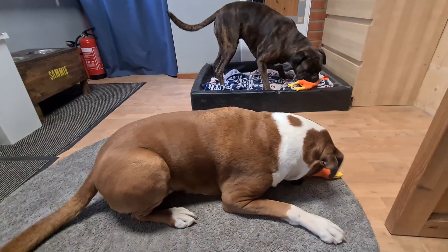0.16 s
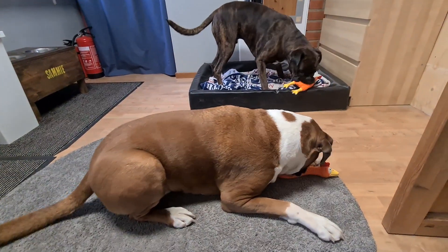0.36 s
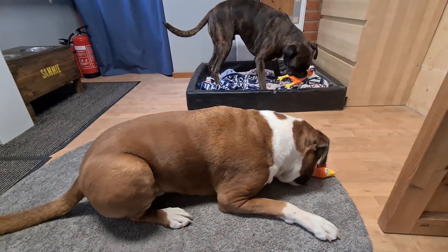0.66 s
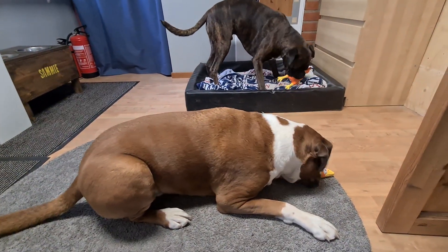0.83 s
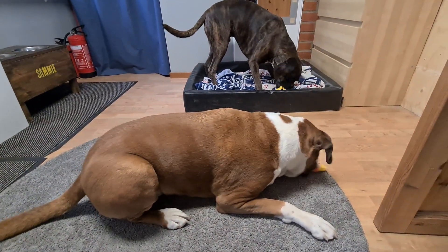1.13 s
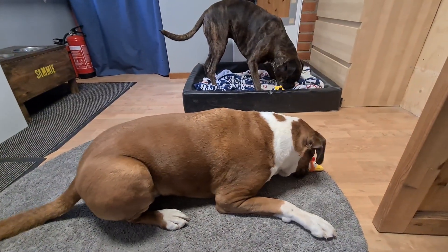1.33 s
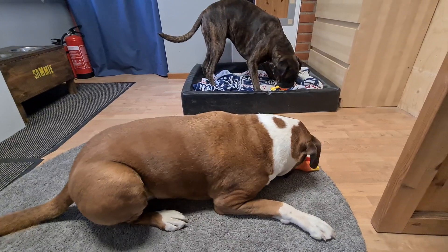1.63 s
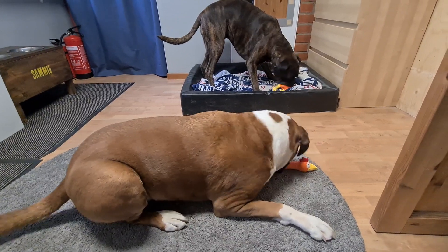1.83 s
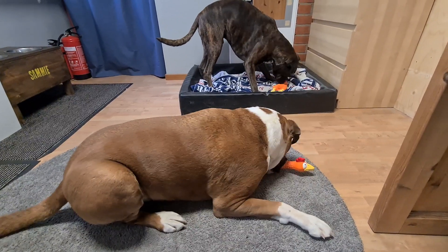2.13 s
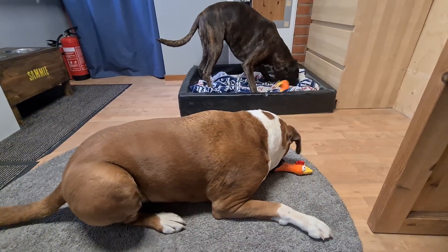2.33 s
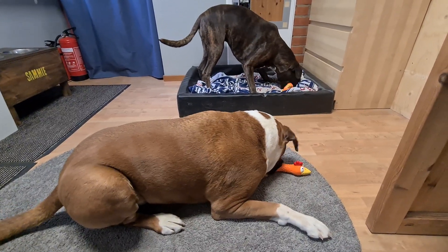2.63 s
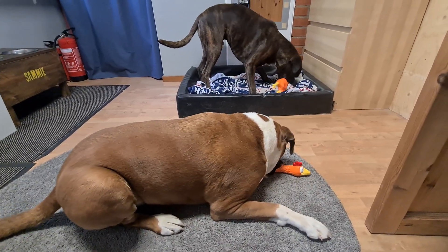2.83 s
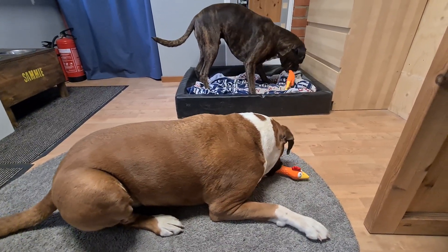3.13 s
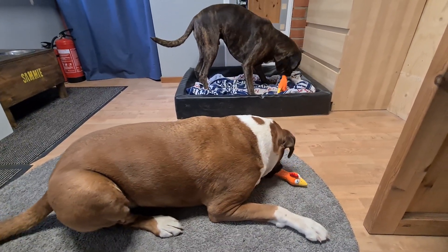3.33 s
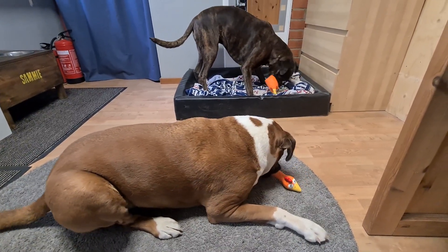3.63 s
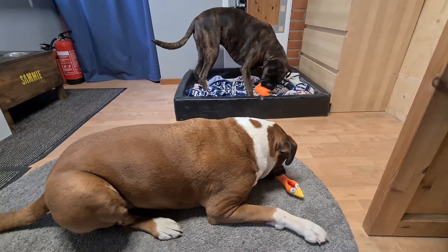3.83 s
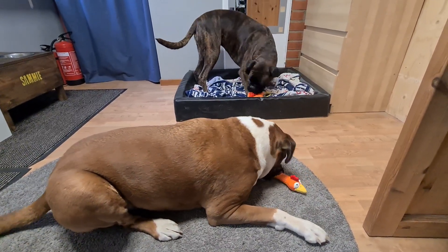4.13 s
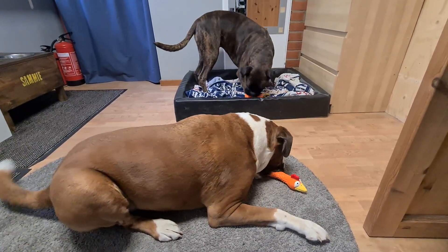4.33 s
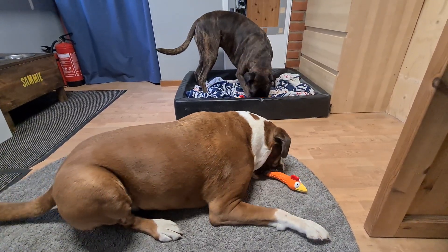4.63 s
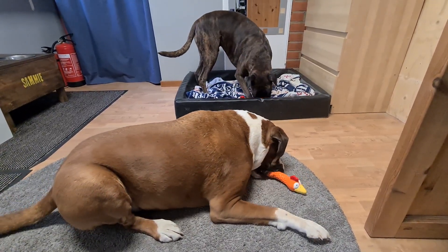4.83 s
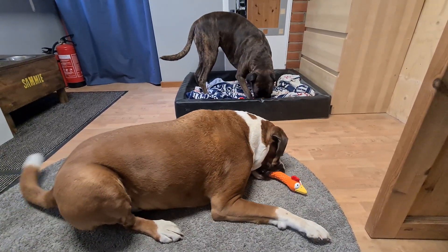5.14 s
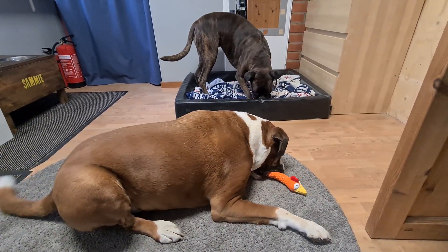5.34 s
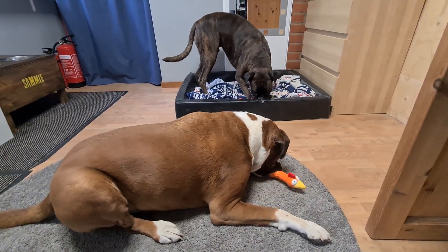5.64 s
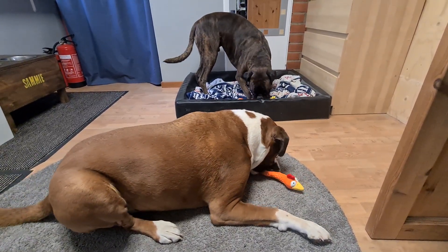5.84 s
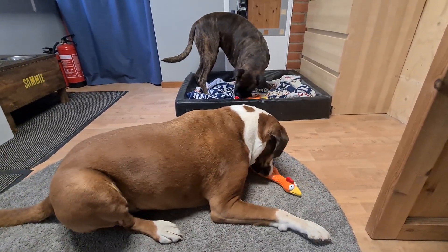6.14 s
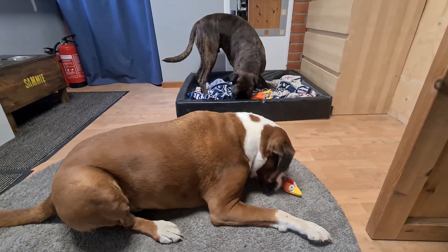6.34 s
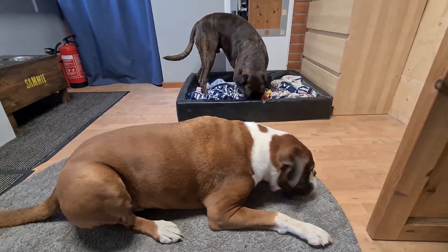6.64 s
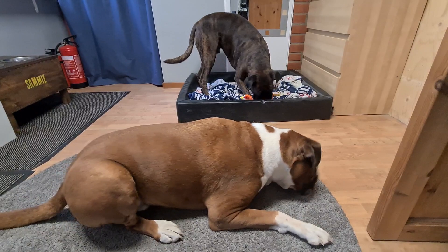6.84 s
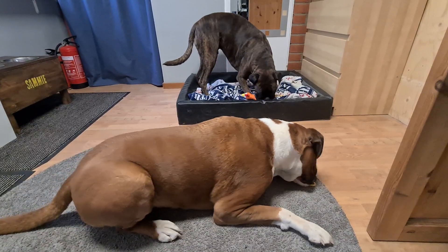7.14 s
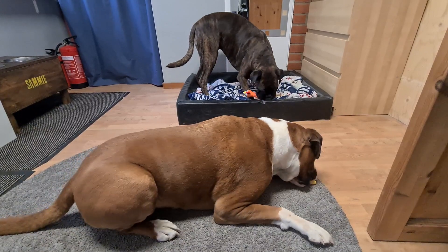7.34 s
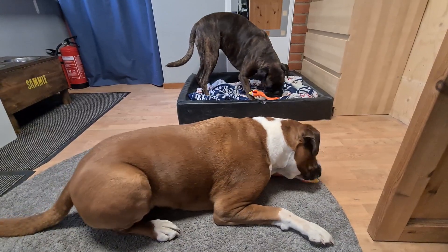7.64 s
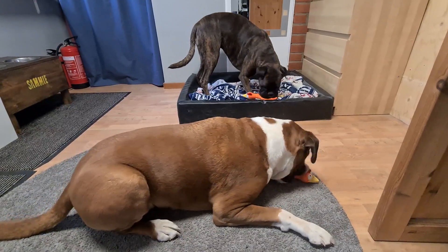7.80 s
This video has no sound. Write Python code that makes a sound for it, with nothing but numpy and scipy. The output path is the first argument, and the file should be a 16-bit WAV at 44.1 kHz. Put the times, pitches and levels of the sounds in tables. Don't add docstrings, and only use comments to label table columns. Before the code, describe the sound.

In a small hard-floored room, two dogs bite rubber squeaky toys, one close and one farther away. After a small nip and a knock, the near toy climbs at about 0.35 seconds into a very high piercing shriek, snaps at 0.6, sags to a hoarse growling squeak and yodels until 0.95. Tiny pips follow, then leaping squeaks from 1.4 to 1.8. The far toy chirps at 2.1, pips near 2.5 to 2.9, and gives long wavering squeaks from 3.1 to 4.0. Until 4.7 there are mostly dull bumps. Faint squeaks and breathy air refills lead to livelier squeaks at 5.5 to 5.9. Another lull carries thumps and rustling; hoarse near squeaks resume from 6.8 to 7.75, ending with a light nip and taps. Low rumble and bedding movement lie underneath, with close stereo sound and short reflections.

```python
import sys
import numpy as np
from scipy import signal
from scipy.fft import rfft, irfft, next_fast_len
from scipy.io import wavfile
from scipy.ndimage import uniform_filter1d

SR = 44100
rng = np.random.default_rng(int(sys.argv[2]) if len(sys.argv) > 2 else 0)


def attenuation_scalar(level_db):
    decades = np.asarray(level_db, float) / 20
    return 10 ** decades


def to_wav(sig):
    pcm = np.clip(np.atleast_2d(sig), -1, 1) * 32767
    pcm = np.round(pcm).astype(np.int16)
    wavfile.write(sys.argv[1], SR, pcm.T)


N = 351477

# pitch_hz, level_db
HISS_COLOUR = [(3000, -18), (8000, -3.5), (10000, 2), (14000, 4.5), (15700, -7)]
HISS_DB = -84.5
# pitch_hz, left_minus_right_db
PORT_LEAN = [(30, -8.5), (80, -0.5), (200, -1), (600, 0), (1400, -2.5), (3000, -4), (6000, -2), (9000, -1),
             (13000, 1)]
NOTCH_HZ, NOTCH_WIDTH_HZ, NOTCH_DB = 7180, 290, -2
# pitch_hz, likeness (0 to 1)
LIKENESS = [(30, 0.4), (70, .8), (120, 1), (400, 0.81), (1000, 0.23), (4000, 0.33)]
# pitch_hz, t60_s
ROOM_T60 = [(150, 0.2), (1200, 0.22), (4000, 0.22), (7000, 0.13), (14000, 0.19)]

# start_s, level_db
RUMBLE = [(0.0, -45), (0.58, -46.5), (0.8, -54), (3.9, -51.5), (4.2, -59.5), (4.62, -61.5), (4.75, -50.5),
          (6.2, -54.5), (7.75, -54.5), (7.97, -48.5)]
# pitch_hz, level_db_per_hz
FLOOR_COLOUR = [(12, -40), (20, -11.5), (80, 2.5), (167, -15), (248, -0.5), (356, -3), (546, -15.5),
                (615, -7.5), (994, -6.5), (1080, -18), (1200, -16), (1560, -46), (2640, -120)]
# start_s, level_db
RUSTLE = [
    (0, -61.5),
    (4.2, -73),
    (4.5, -72),
    (6.1, -71),
    (6.3, -67),
    (6.5, -66),
    (6.75, -67),
    (7.97, -54),
]
# pitch_hz, level_db_per_hz
RUSTLE_COLOUR = [(760, -24), (1300, 1.5), (2520, -8.5), (3020, -7.5), (5580, -14.5), (6780, -40.5),
                 (9000, -29), (11700, -59), (19800, -120)]
DUCK_DB, DUCK_FROM_DB = -11, -40

# start_s, peak_db
JAWS = [(0.709, -34), (0.795, -32.5), (1.025, -27.5), (1.355, -34.5), (2.117, -29.5), (2.282, -57),
        (2.695, -30.5), (3.296, -48), (3.616, -31.5), (3.776, -35.5), (4.269, -40.5), (4.497, -35.5),
        (4.74, -39), (5.005, -37), (5.6, -34.5), (5.718, -37.5), (5.814, -32.5), (6.803, -25.5),
        (7.827, -27.5)]
# start_s, peak_db
SHIFTS = [(.334, -28.5), (1.22, -41), (1.473, -36), (1.788, -29), (4.087, -35), (4.201, -37), (5.122, -40),
          (6.555, -25), (6.755, -33.5), (7.291, -36), (7.567, -46)]
# start_s, peak_db, centre_hz
KNOCKS = [(.181, -23.5, 323), (0.574, -38, 81), (2.005, -24, 404), (2.455, -32.5, 431), (2.523, -26, 97),
          (3.098, -35, 377), (3.49, -30.5, 320), (4.371, -45, 327), (4.5, -57.5, 450), (4.63, -41, 344),
          (4.649, -39, 77), (5.914, -35.5, 376), (6.073, -41.5, 320), (5.365, -37.5, 129),
          (5.447, -27.5, 105), (6.3, -50.5, 79), (7.091, -30.5, 172.7), (7.098, -26, 603),
          (7.738, -34.5, 359)]
# start_s, peak_db, centre_hz
TAPS = [(0.034, -58, 250), (0.121, -42, 802), (1.248, -40, 440), (2.457, -37.5, 434), (4.511, -37, 329),
        (4.579, -52, 384), (4.685, -44.5, 210), (6.562, -27, 358), (6.762, -37, 235.2), (7.835, -27.5, 601),
        (7.954, -24, 964)]
JAW_HZ, JAW_T60_S, SHIFT_HZ, SHIFT_T60_S = 250, 0.19, 245, 0.44
KNOCK_T60_S, TAP_T60_S = 0.2, 0.12
BLOW_RISE = 0.026
# start_s, peak_db
BOOMS = [(1.792, -27.5), (4.087, -31), (4.148, -28.5), (4.199, -31), (4.368, -47), (4.63, -39.5),
         (5.913, -30), (6.071, -35.5)]
BOOM_HZ, BOOM_T60_S = 225, 0.081
# start_s, peak_db
SNAPS = [(.588, -21.5), (2.58, -60), (.124, -59), (1.249, -64), (6.562, -62), (3.793, -41.5), (4.5, -75),
         (1.957, -43.5), (2.5, -52), (6.4, -55.5)]
SNAP_T60_S, SNAP_CUT_HZ = 0.046, 6500

# start_s, stop_s, first_hz, last_hz, level_db
WHISTLES = [(0.557, 0.86, 5300, 5700, -26.5), (3.139, 3.21, 1770, 2315, -44.5),
            (3.384, 3.463, 2100, 2000, -51.5), (3.805, 3.934, 2280, 1400, -45),
            (3.836, 3.95, 1134, 1000, -47.5), (5.65, 5.734, 3000, 1300, -39), (1.3, 0.72, 4000, 4300, -23),
            (5.64, 5.73, 3100, 2900, -43), (2.5, 2.84, 2100, 1850, -60)]
# start_s, stop_s, first_db, last_db
REFILLS = [(2.298, 2.44, -72, -110.5), (2.554, 2.698, -50.5, -62.5), (2.883, 3.205, -54.5, -43.5),
           (4.799, 4.942, -40, -38), (4.958, 5.171, -57, -46.5), (5.184, 5.395, -36, -41.5),
           (5.464, 5.531, -38.5, -57), (6.064, 6.343, -61, -59), (6.38, 6.56, -64.5, -58)]
# pitch_hz, level_db_per_hz
LEAK_COLOUR = [(900, -3.5), (1800, -2.5), (2400, -3), (3000, 11), (3600, -8), (5500, -11), (7000, -18),
               (15000, -27.5)]

# pitch_hz, level_db
NEAR_BODY = [(1180, -28), (2000, -5.5), (2560, -12.5), (3230, -8), (3520, -11.5), (4360, -4), (6140, -5.5),
             (7230, -21), (8730, -21), (11100, -16.5), (15500, -51)]
FAR_BODY = [(1180, -21), (2000, -17.5), (2700, 1.5), (3610, -2), (3940, 1.5), (4250, -1), (5740, 2.5),
            (7680, -17.5), (8360, -11), (12900, -12.5), (15500, -37)]
# opening_hz, closing_hz, overtones_db (against the tone), extra_db_per_db of effort, extra_db_per_octave
NEAR_REED = (1129.5, 1149, 2.5, 0.973, -11.5)
FAR_REED = (1311.5, 1271, -22, 0.35, 12)
# start_s, stop_s, air_db (against the overtones)
HOARSE = [(.37, .44, -7), (.58, .605, 0), (.6, .66, -13), (.66, .73, -18), (.73, .81, -20), (.885, .96, -7),
          (1.42, 1.47, -6), (1.575, 1.66, -4), (1.8, 1.85, -6), (1.995, 2.05, -10), (3.735, 3.81, -5),
          (3.81, 4.0, -14), (4.73, 4.83, -10), (4.93, 5.03, -12), (5.41, 5.48, -11), (5.565, 5.66, -4),
          (5.65, 5.79, -6), (5.805, 5.84, -6), (5.905, 5.97, -2), (6.82, 6.9, -5), (6.9, 6.97, -18),
          (6.965, 7.04, 0), (7.105, 7.25, -2), (7.3, 7.4, -7), (7.46, 7.53, 0), (7.69, 7.77, -8),
          (7.91, 7.97, -10)]
BREAK_UP = 1.15
# start_s, stop_s, overtones_db, high_extra_db, octave_extra_db
MOUTHING = [(0.167, .34, 4, 0, -3.8), (0.346, .435, -3.5, 2, 0.5), (0.439, .59, -4.5, -0.5, 12.3),
            (0.593, 0.724, 3.5, 2.5, -0.5), (0.727, .806, -5, 1.5, 2), (.806, 1.0, 3.5, -5.5, -1.1),
            (1.04, 1.351, -3.5, 0.5, -3), (1.391, 1.655, -2.5, -5, 3), (1.669, 1.901, 0.5, -0.5, -0.1),
            (1.947, 2.082, 6, -1.5, -13), (2.12, 2.35, -3, 2.5, 5.5), (2.477, 2.62, 3, 0, 5.5),
            (2.71, 2.904, 2, -2, 2.5), (3.082, 3.33, -4, 0, 3.5), (3.33, 3.6, -1, 1, -3),
            (3.61, 3.74, 2, 1, -1), (3.74, 4.1, 5, 2.5, -1.1), (4.697, 4.9, -0.5, -0.5, 0),
            (4.92, 5.22, -1, 3, 2), (5.24, 5.35, -1.5, 3.5, 7), (5.36, 5.5, -3, -0.5, 3.3),
            (5.537, 5.8, 1.5, -2.5, -1), (5.799, 6.001, -5, 3, 5), (6.798, 7.079, 1, 0.5, 0),
            (7.089, 7.279, 1.5, -6.5, 0.1), (7.293, 7.562, -0.5, -0.5, 0.3), (7.583, 7.801, 1.5, 1.5, 6.5),
            (7.826, 7.969, -1.5, -1, 3.5)]
HIGH_FROM_HZ = 7000

# start_s, length_s, top_hz, end_hz, level_db
NEAR_NIPS = [
    (.18, .09, 1174, 1086, -41.5),
    (7.832, 0.11, 1263, 1128, -41.5),
]
FAR_NIPS = [
    (2.722, .158, 1384, 1279, -34),
]
QUICK_NIPS = [
    (1.048, 0.05, 1115, 937.6, -47.5),
    (1.278, 0.051, 1103, 1083, -50.5),
]
FAR_QUICK_NIPS = [
    (2.485, .065, 1306, 1233, -41),
]
MUFFLED_NIPS = [
    (4.94, .24, 1186, 1035, -54),
]
FAR_MUFFLED_NIPS = [
    (5.7, 0.1, 1305, 1255, -35.5),
]
# full_effort_share of the length, start_db and end_db against full effort, top_pitch_share
NEAR_ARCH = (1, -6.5, -10, .5)
FAR_ARCH = (0.46, -8.5, -4, .5)
QUICK_ARCH = (0.4, 2.5, -5.5, -5.5)
MUFFLED_ARCH = (0.7, 5.5, -1.5, -0.7)
# start_s, pitch_hz, level_db
NEAR_SLIPS = [
    [(1.956, 1123, -51.5), (1.998, 1113, -51.5), (2.011, 1036, -62.5), (2.025, 1093, -56)],
    [(5.37, 1117, -55), (5.415, 1097, -50.5), (5.44, 1018, -51.5), (5.465, 1081, -63)],
]
FAR_SLIPS = [
    [(5.248, 1310, -38), (5.295, 1300, -39), (5.312, 1170, -50), (5.325, 1220, -48)],
]
# start_s, pitch_hz, level_db
FIRST_MAULING = [
    [(.35, 1163, -38), (.385, 1560, -34.5), (.393, 1560, -30.5), (.396, 1865, -37), (.412, 2290, -26.5),
     (.432, 2420, -43.5)],
    [(.434, 3234, -31.5), (.455, 3730, -27.5), (.475, 3860, -25), (.487, 4200, -22.5), (.52, 4287, -19.5),
     (.54, 4443, -20.5), (.556, 4473, -29), (.558, 5940, -36), (.572, 5820, -30.5), (.588, 5784, -28.5)],
    [(.59, 1930, -46.5), (.603, 1930, -38), (.613, 1776, -31), (.63, 1716, -41), (.64, 1501, -36.5),
     (.652, 1304, -39.5), (.685, 1203, -45), (.7, 1253, -39.5), (.718, 1594, -36)],
    [(.72, 1906, -34), (.751, 2021, -32), (.754, 2205, -29), (.765, 2212, -34.5), (.768, 1992, -29),
     (.79, 2072, -32.5), (.806, 2428, -31)],
    [(.808, 3202, -31), (.85, 3425, -29.5), (.872, 3330, -33), (.888, 2920, -28), (.9, 1766, -41),
     (.92, 1287, -39.5)],
]
SECOND_MAULING = [
    [(1.4, 1104, -43.5), (1.462, 1637, -39.5), (1.466, 2063, -37), (1.52, 1927, -34), (1.544, 2356, -34),
     (1.548, 3030, -26.5), (1.574, 3126, -41.5), (1.578, 1867, -36), (1.602, 1304, -39)],
    [(1.686, 1168, -42.5), (1.712, 1393, -40), (1.74, 1583, -39), (1.76, 1602, -38), (1.785, 1572, -39),
     (1.805, 1390, -41.5)],
]
LATE_CHEWS = [
    [(4.715, 1112, -54.5), (4.745, 1209, -44.5), (4.785, 1270, -45)],
    [(5.535, 1160, -49), (5.573, 1279, -40), (5.6, 1555, -40.5), (5.643, 1829, -38.5), (5.647, 2589, -38),
     (5.73, 2580, -40), (5.745, 1477, -51.5)],
    [(5.808, 1162, -41.5), (5.827, 1408, -40), (5.85, 1497, -38), (5.885, 1567, -39), (5.915, 1503, -41)],
    [(7.59, 1171, -48), (7.636, 1261, -46), (7.685, 1410, -44.5), (7.725, 1261, -46.5)],
    [(6.808, 1146, -46.5), (6.89, 1620, -38), (6.894, 2105, -36.5), (6.93, 2424, -35), (6.97, 2271, -37.5),
     (6.977, 2039, -37.5), (6.992, 1451, -43)],
    [(7.105, 1197, -45), (7.151, 2126, -38.5), (7.165, 2180, -39.5), (7.205, 1500, -43.5)],
    [(7.295, 1083, -45), (7.336, 1711, -39.5), (7.34, 1849, -38.5), (7.398, 2067, -38),
     (7.401, 2308, -35.5), (7.465, 2282, -37), (7.472, 2000, -38), (7.483, 1474, -43)],
]
FAR_CHEWS = [
    [(2.128, 1303, -39), (2.14, 1377, -33.5), (2.17, 1419, -33.5), (2.21, 1392, -30.5),
     (2.245, 1356, -33.5)],
    [(3.085, 1303, -45), (3.115, 1312, -32.5), (3.2, 1465, -30.5), (3.26, 1555, -31), (3.32, 1343, -30.5),
     (3.4, 1467, -30), (3.44, 1480, -27.5), (3.515, 1251, -31.5)],
    [(3.618, 1315, -35.5), (3.658, 1375, -29.5), (3.7, 1415, -31), (3.735, 1520, -26.5), (3.739, 1650, -33),
     (3.76, 1755, -30.5), (3.794, 1805, -30.5), (3.799, 1424, -29), (3.9, 1446, -30.5), (3.94, 1331, -30),
     (4.0, 1254, -39.5)],
]
LET_GO_S, LET_GO_DB = .045, -9.5
QUICK_SHINE_DB, MUFFLED_SHINE_DB, FAR_MUFFLED_SHINE_DB, LATE_SHINE_DB = 6.5, -2, -2.5, -2


def at_hz(points, hz):
    points = np.array(points)
    return np.interp(np.log(hz), np.log(points[:, 0]), points[:, 1])


def rms_one(x):
    return x / np.sqrt(np.mean(x ** 2) + 1e-20)


def filtered(x, order, cut_hz, kind="low"):
    return signal.sosfilt(signal.butter(order, cut_hz, kind, fs=SR, output="sos"), x)


def drift(rate_hz):
    r = np.exp(-2 * np.pi * rate_hz / SR)
    white = rng.standard_normal(N + SR)
    return rms_one(signal.lfilter([1], [1, -2 * r, r * r], white)[SR:])


def rasp(cut_hz):
    return rms_one(filtered(rng.standard_normal(N), 6, cut_hz))


def coloured(spectrum):
    size = next_fast_len(N)
    hz = np.maximum(np.fft.rfftfreq(size, 1 / SR), 1)
    white = rfft(rng.standard_normal(size))
    return rms_one(irfft(white * attenuation_scalar(at_hz(spectrum, hz)), size)[:N])


def window(start_s, stop_s):
    gate = np.zeros(N)
    span = np.arange(round(start_s * SR), round(stop_s * SR))
    from_edge_s = np.minimum(span / SR - start_s, stop_s - span / SR)
    gate[span] = np.clip(from_edge_s / .015, 0, 1)
    return gate


def half_octaves(low_hz, count):
    edges = low_hz * 2 ** (np.arange(count + 1) / 2)
    return [(np.sqrt(a * b), signal.butter(2, [a, b], "band", fs=SR, output="sos"))
            for a, b in zip(edges, edges[1:])]


def banded_noise(spectrum, low_hz, count, patchy_db, rate_hz):
    out, together = 0, drift(rate_hz / 3)
    white = rng.standard_normal((2, 2, N))
    for k, (hz, band) in enumerate(half_octaves(low_hz, count)):
        mid, side = signal.sosfilt(band, white[k % 2])
        alike = np.clip(at_hz(LIKENESS, hz), 0, 1)
        gain = attenuation_scalar(at_hz(spectrum, hz) + patchy_db * (together + drift(rate_hz)))
        out = out + gain * (np.sqrt(1 + alike) * mid + np.sqrt(1 - alike) * side * [[1], [-1]])
    return rms_one(out)


def room(x, gap_s):
    t = np.arange(SR // 2) / SR
    white = rng.standard_normal((2, len(t)))
    tail = 0
    for hz, band in half_octaves(61.43, count=16):
        tail = tail + signal.sosfilt(band, white) * attenuation_scalar(-60 * t / at_hz(ROOM_T60, hz))
    tail = rms_one(tail * np.clip(t / gap_s - 1, 0, 1)) / np.sqrt(len(t))
    return signal.fftconvolve(x[None], tail, axes=1)[:, :N]


def place(x, lag):
    return np.array([np.interp(np.arange(N) - lag, np.arange(N), x), x])


def hiss():
    return attenuation_scalar(HISS_DB) * np.array([coloured(HISS_COLOUR), coloured(HISS_COLOUR)])


def rumble():
    level_db = np.interp(np.arange(N) / SR, *np.transpose(RUMBLE))
    return filtered(attenuation_scalar(level_db) * banded_noise(FLOOR_COLOUR, 18, count=12, patchy_db=3, rate_hz=10), 6, 950)


def rustle(squeaks):
    level_db = np.interp(np.arange(N) / SR, *np.transpose(RUSTLE))
    brushing = attenuation_scalar(level_db) * banded_noise(RUSTLE_COLOUR, 900, count=7, patchy_db=1.2, rate_hz=15)
    loud = uniform_filter1d(squeaks ** 2, size=1000) / attenuation_scalar(2 * DUCK_FROM_DB)
    return brushing * attenuation_scalar(DUCK_DB * loud / (1 + loud))


def thumps():
    out, t = np.zeros(N + SR), np.arange(SR // 2) / SR
    blows = [(*row, JAW_HZ, JAW_T60_S) for row in JAWS]
    blows += [(*row, SHIFT_HZ, SHIFT_T60_S) for row in SHIFTS]
    blows += [(*row, KNOCK_T60_S) for row in KNOCKS]
    blows += [(*row, TAP_T60_S) for row in TAPS]
    for start_s, peak_db, hz, t60_s in blows:
        burst = rms_one(filtered(rng.standard_normal(len(t)), 1, [hz / 1.27, hz * 1.47], "band"))
        burst = filtered(burst, 4, 1000)
        rise = np.clip(t / (BLOW_RISE * t60_s), 0, 1)
        decay = attenuation_scalar(-60 * t / max(t60_s, .03)) * (1 - 2 * t)
        out[round(start_s * SR):][:len(t)] += attenuation_scalar(peak_db - 9.5) * burst * rise * decay
    return out[:N]


def booms():
    pushes = np.zeros(N)
    pushes[[round(s * SR) for s, db in BOOMS]] = attenuation_scalar(np.array(BOOMS)[:, 1])
    soft = signal.lfilter(np.hanning(200) / 60, 1, pushes) + 1e-18
    r, w = attenuation_scalar(-60 / (BOOM_T60_S * SR)), 2 * np.pi * BOOM_HZ / SR
    ring = signal.lfilter([0, np.sin(w)], [1, -2 * r * np.cos(w), r * r], soft)
    return filtered(ring, 2, 120, "high")


def snaps():
    t = np.arange(N) / SR
    shape = sum(attenuation_scalar(db - 60 * np.maximum(t - s, 0) / SNAP_T60_S) * (t >= s) for s, db in SNAPS)
    return shape * filtered(rng.standard_normal(N), 2, SNAP_CUT_HZ)


def whistles():
    t, out = np.arange(N) / SR, 0
    for start_s, stop_s, first_hz, last_hz, db in WHISTLES:
        hz = np.interp(t, [start_s, stop_s], [first_hz, last_hz])
        tone = np.sin(2 * np.pi * np.cumsum(hz) / SR)
        out = out + attenuation_scalar(db) * window(start_s, stop_s) * rasp(cut_hz=59) * tone
    return out


def stretches_in_time(stretches, smooth):
    t, gate = np.arange(N) / SR, np.zeros(N)
    first_values = np.array(stretches[0][0][1:])
    columns = np.zeros((len(first_values), N)) + first_values[:, None]
    for rows in stretches:
        s, *values = np.transpose(sorted(rows))
        start, stop = round(s[0] * SR), round(s[-1] * SR)
        line = np.array([np.interp(t[start:stop], s, v) for v in values])
        columns[:, start:stop] = uniform_filter1d(line, size=smooth, mode="nearest")
        columns[:, stop:] = columns[:, stop - 1:stop]
        gate[start:stop + 100] = 1
    gate = gate * np.roll(gate, 160)
    in_use = np.roll(gate, -160)[:-150] + gate[:-150] > 0
    columns[:, :-150] = np.where(in_use, columns[:, :-150], columns[:, 150:])
    return columns, uniform_filter1d(gate, size=180)


def leak():
    refills = [[(a, first_db), (b, last_db)] for a, b, first_db, last_db in REFILLS]
    (level_db,), open_valve = stretches_in_time(refills, smooth=1200)
    return uniform_filter1d(open_valve, size=1500) * attenuation_scalar(level_db - 7.5) * coloured(LEAK_COLOUR)


def nips(rows, reed, arch):
    effort_share, start_db, end_db, top_share = arch
    u = np.linspace(0, 1, 9)
    swell_db = np.interp(u, [0, np.clip(effort_share, .05, .95), 1], [start_db, 0, end_db])
    lift = np.sin(np.interp(u, [0, np.clip(top_share, .05, .95), 1], [0, np.pi / 2, np.pi]))
    out = []
    for s, length_s, top_hz, end_hz, db in rows:
        rest_hz = np.where(u < max(top_share, .05), reed[0], end_hz)
        out.append(list(zip(s + length_s * u, (1 - lift) * rest_hz + lift * top_hz, db + swell_db)))
    return out


def chews(bites, reed):
    out, starts = [], np.array([min(b)[0] for b in bites])
    for rows in map(sorted, bites):
        last_s, _, last_db = rows[-1]
        if np.abs(starts - last_s).min() > .04:
            rows = rows + [(last_s + LET_GO_S, reed[1], last_db + LET_GO_DB)]
        out.append([rows[0]])
        for before, row in zip(rows, rows[1:]):
            if row[0] - before[0] < .007 and abs(np.log(row[1] / before[1])) > .09:
                out.append([])
            out[-1].append(row)
    return out


def voiced(stretches, reed, shine_db=0):
    opening_hz, _, overtones_db, per_db, per_octave = reed

    def upper_db(hz, db):
        return db + shine_db + overtones_db + per_db * (db + 40) + per_octave * np.log2(hz / opening_hz)

    return [[(s, hz, db, upper_db(hz, db)) for s, hz, db in rows] for rows in stretches if len(rows) > 1]


def far_bites():
    plain = nips(FAR_NIPS, FAR_REED, FAR_ARCH) + nips(FAR_QUICK_NIPS, FAR_REED, QUICK_ARCH)
    plain += chews(FAR_CHEWS, FAR_REED)
    muffled = nips(FAR_MUFFLED_NIPS, FAR_REED, QUICK_ARCH) + FAR_SLIPS
    return sorted(voiced(plain, FAR_REED) + voiced(muffled, FAR_REED, FAR_MUFFLED_SHINE_DB))


def near_bites():
    plain = nips(NEAR_NIPS, NEAR_REED, NEAR_ARCH) + chews(FIRST_MAULING + SECOND_MAULING, NEAR_REED)
    late = chews(LATE_CHEWS, NEAR_REED)
    quick = nips(QUICK_NIPS, NEAR_REED, QUICK_ARCH) + NEAR_SLIPS
    muffled = nips(MUFFLED_NIPS, NEAR_REED, MUFFLED_ARCH)
    return sorted(voiced(plain, NEAR_REED) + voiced(late, NEAR_REED, LATE_SHINE_DB)
                  + voiced(quick, NEAR_REED, QUICK_SHINE_DB) + voiced(muffled, NEAR_REED, MUFFLED_SHINE_DB))


def squeaker(stretches, body, overtone_db, wobble, rough, air_db):
    (hz, first_db, upper_db), blown = stretches_in_time(stretches, smooth=450)
    first_db, upper_db = uniform_filter1d([first_db, upper_db], size=250)

    hoarse = sum(attenuation_scalar(db) * window(a, b) for a, b, db in HOARSE)
    soon_silent = 1 - uniform_filter1d(np.roll(blown, -1300), size=900)
    hoarse += attenuation_scalar(-7.5) * soon_silent

    pitch = hz * (1 + wobble * (1 + 9 * hoarse) * rasp(cut_hz=130))
    phase = 2 * np.pi * np.cumsum(pitch) / SR
    cover_db, high_db, octave_db = sum(np.outer(row[2:], window(*row[:2])) for row in MOUTHING)
    upper = attenuation_scalar(upper_db + overtone_db + cover_db) * np.sqrt(pitch / 1500)

    strain = rough * (1 + 2.5 * hoarse)
    tone = attenuation_scalar(first_db) * np.sin(phase) * (1 + 0.49 * strain * rasp(cut_hz=137))
    steady = np.clip(1 - BREAK_UP * hoarse, 0, 1)
    for k in range(2, 15):
        heard = (k * pitch < 15600) * np.where(k * pitch > HIGH_FROM_HZ, attenuation_scalar(high_db), 1)
        if k == 2:
            heard = heard * attenuation_scalar(octave_db)
        torn = steady + (1 - steady + rough) * rasp(cut_hz=190)
        shell = attenuation_scalar(at_hz(body, k * pitch)) * torn
        tone += upper * shell * heard * np.sin(k * phase + rng.uniform(0, 2 * np.pi))
    air = attenuation_scalar(air_db) + .55 * hoarse
    return blown * (np.sqrt(2) * tone + coloured(body) * upper * air)


def scene():
    far = squeaker(far_bites(), FAR_BODY, overtone_db=8, wobble=.002, rough=.18, air_db=-46)
    far = far + leak() + whistles()
    near = squeaker(near_bites(), NEAR_BODY, overtone_db=11, wobble=.003, rough=.25, air_db=-34)
    blows = thumps() + booms() + snaps()
    direct = attenuation_scalar(1.0) * place(near, lag=-1.29) + attenuation_scalar(-0.93) * place(far, lag=-7.0) + place(blows, lag=0)
    echoes = attenuation_scalar(5.5) * room(near, gap_s=0.0029)
    echoes += attenuation_scalar(-0.5) * room(far, gap_s=0.0065)
    echoes += attenuation_scalar(-2.5) * room(blows, gap_s=0.00096)
    return hiss() + rumble() + rustle(near + far) + direct + echoes


def low_pass(x):
    return signal.sosfilt(signal.butter(12, 15710, fs=SR, output="sos"), x)


def record(dry):
    size = next_fast_len(N)
    hz = np.fft.rfftfreq(size, 1 / SR)
    lean_db = at_hz(PORT_LEAN, np.maximum(hz, 1)) * np.array([[.5], [-.5]])
    notch_db = NOTCH_DB * np.exp(-((hz - NOTCH_HZ) / NOTCH_WIDTH_HZ) ** 2)
    ports = irfft(rfft(dry, size) * attenuation_scalar(notch_db + lean_db), size)[:, :N]
    return low_pass(ports)


dry = scene()
out = record(dry)
to_wav(out)
```